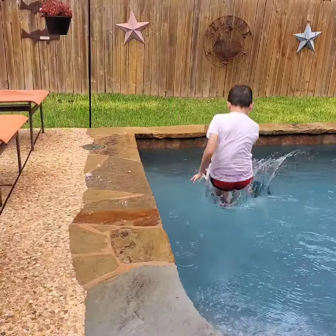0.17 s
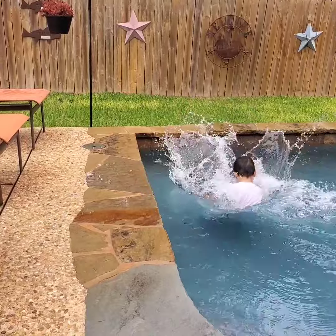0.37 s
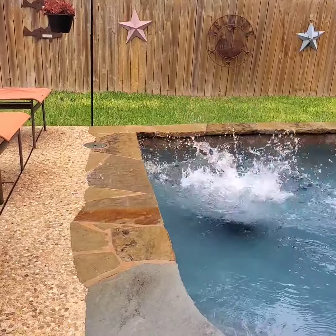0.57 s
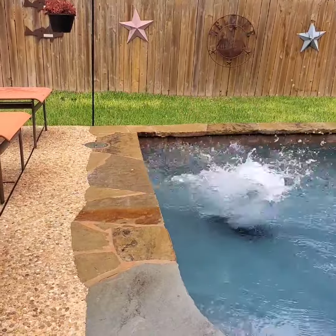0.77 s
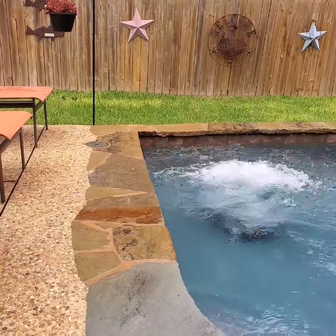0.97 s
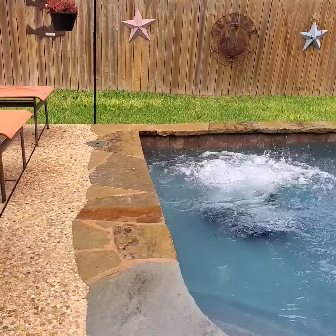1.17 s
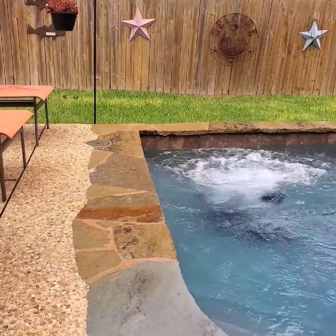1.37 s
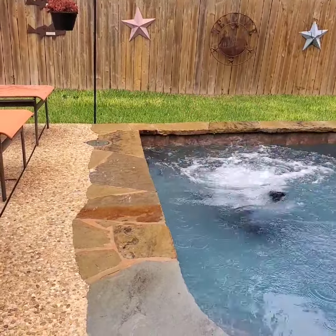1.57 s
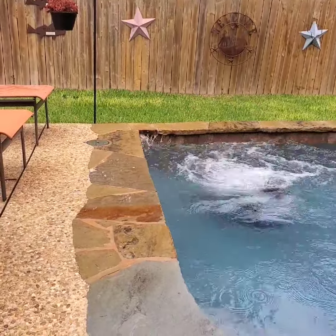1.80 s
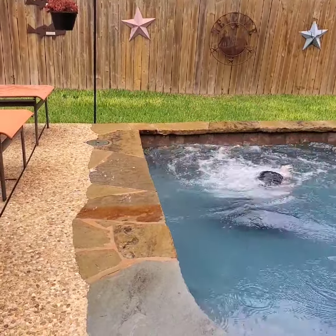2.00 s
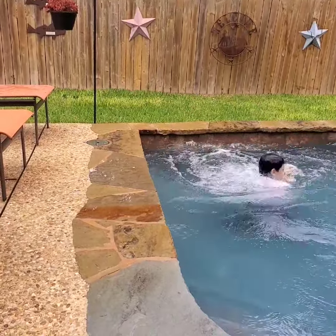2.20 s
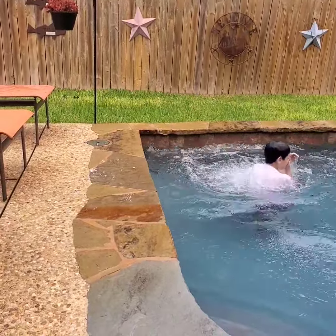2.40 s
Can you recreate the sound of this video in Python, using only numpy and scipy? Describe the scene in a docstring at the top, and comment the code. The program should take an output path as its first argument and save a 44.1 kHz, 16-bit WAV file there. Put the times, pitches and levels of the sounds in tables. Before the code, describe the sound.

Pool splash heard from a few metres off, leaning slightly left: light first contact, loud smack, booming gulp, second heavy splash, then hissing bubbles, ticking drops on water and stone, and quiet gurgling at the end.

```python
"""Backyard pool, a few metres away: a child jumps in feet first.
Slaps are decaying noise bursts; the closing air cavity plunks as swelling, gliding sines over deeper heaves.
Spray, falling sheets and churn are swarms of rising bubble rings over noise; clots pelt as noise cracks.
Drops tick as noise on water and the stone rim, with small ringing bubbles; late air pockets gurgle
as the swimmer comes up. Low rumble and garden hush lie beneath; deck and fence reflect the splash."""
import sys
import numpy as np
from scipy import signal
from scipy.fft import rfft, irfft
from scipy.io import wavfile

SR = 44100
rng = np.random.default_rng(int(sys.argv[2]) if len(sys.argv) > 2 else 0)


def store_pcm(level_fs):
    """Save levels as 16-bit WAV."""
    pcm = np.round(np.clip(level_fs, -1, 1) * 32767).astype(np.int16)
    wavfile.write(sys.argv[1], SR, np.atleast_2d(pcm).T)


N = 108045
TIME, HZ = np.arange(N) / SR, np.fft.rfftfreq(N, 1 / SR)

# Every *_COLOUR_DB table is a spectrum. Each row: frequency in Hz, relative level in dB.
# Every *_LEVEL_DB table is a level curve. Each row: time in seconds, level in dB.

# Low rumble of moving water and air; faint garden hush.
RUMBLE_LEVEL_DB = [(0, -42.5), (.25, -46), (.3, -31.5), (.36, -38), (.44, -30.5), (.5, -32), (.6, -66),
                   (.68, -36), (.76, -48.5), (.95, -42), (1.2, -55), (1.49, -43), (1.6, -46.5), (2.0, -46),
                   (2.29, -41), (2.45, -49.5)]
RUMBLE_COLOUR_DB = [(34, -36), (48, 2), (70, -0.5), (115, 2.5), (150, -15), (240, -15), (400, -33)]
AIR_DB = -51.5
AIR_COLOUR_DB = [(120, 3), (165, -19), (245, -2.5), (290, -23), (800, -16.5), (1300, -31), (8000, -37.5),
                 (16000, -68)]

# Fine spray and foam.
SPRAY_LEVEL_DB = [(.101, -72), (.109, -36.5), (.145, -34.5), (.24, -30.5), (.3, -34), (.49, -35),
                  (.6, -36.5), (.8, -44), (.97, -42), (1.25, -45.5), (1.48, -47.5), (1.56, -51.5),
                  (1.72, -49.5), (2.03, -55.5), (2.25, -55.5), (2.45, -50)]
SPRAY_COLOUR_DB = [(500, -45), (1100, -3), (1600, -1), (2600, 0.5), (4500, 3), (6500, -1), (7700, -8),
                   (9500, -4.5), (13000, -2), (16000, -1)]
# Sheets of water falling back and sloshing.
SLOSH_LEVEL_DB = [(.102, -62.5), (.112, -55), (.19, -39.5), (.245, -32), (.265, -25), (.32, -28.5),
                  (.35, -30.5), (.41, -30.5), (.485, -26), (.53, -30), (.59, -34), (.76, -39.5),
                  (1.02, -40.5), (1.3, -48), (1.73, -50), (1.98, -58), (2.15, -57.5), (2.24, -45),
                  (2.32, -50.5), (2.45, -45)]
SLOSH_COLOUR_DB = [(250, 2), (480, -13.5), (630, -4), (820, 0), (1000, -4), (1200, -15), (1520, -5.5),
                   (2000, -14), (6000, -21.5)]
# Bubble cloud under the surface.
CHURN_LEVEL_DB = [(.1, -71), (.125, -46.5), (.23, -40), (.29, -23), (.37, -30), (.49, -29.5), (.59, -40),
                  (.68, -42), (.8, -39.5), (.94, -43.5), (1.05, -47.5), (1.27, -44.5), (1.36, -51),
                  (1.7, -58.5), (2.04, -59.5), (2.13, -45), (2.28, -54.5), (2.45, -66)]
CHURN_COLOUR_DB = [(60, -35), (130, -6.5), (250, 1), (370, -0.5), (480, -6.5), (700, -10.5)]
SPREAD_S = .00009  # rms scatter of arrival times between the ears

# Coarse clots pelting down with the falling sheets; PELT_DB is relative to the slosh curve.
PELT_PER_S, PELT_DECAY_S, PELT_DB = 380, 0.0014, -7.5
PELT_COLOUR_DB = [(600, -5), (1500, 7), (4500, -1.5), (7000, -15.5)]

# Slaps of limbs and body on the surface. Each row: start in seconds, onset level in dB, decay in seconds.
SLAPS = [(.111, -29.5, .002), (0.1238, -21.5, 0.0021), (0.1494, -26.5, 0.006), (0.2496, -5.5, 0.0011),
         (0.2508, -10.5, 0.0021), (0.256, -26.5, 0.015), (0.277, -20, 0.0098), (.309, -27, 0.0033),
         (0.483, -22, 0.0061)]
SLAP_COLOUR_DB = [(100, -23), (400, -8), (850, 9), (1150, -1), (2000, 4.5), (5900, -1.5), (7500, -18),
                  (11000, -24), (16000, -12)]

# Large air pockets ringing as they close, behind the body and later round the surfacing head.
# Each row: start in seconds, starting pitch in Hz, level in dB, swell time in seconds,
# glide in octaves per second.
POCKETS = [(.251, 809, -19, 0.009, -7.5), (0.2714, 403, -8.5, 0.0055, -5), (.276, 256, -15.5, 0.0056, 7.5),
           (.297, 377, -22, 0.0075, 7), (.319, 329.5, -22, 0.01, 2), (.3205, 772, -15, 0.0018, -3),
           (0.331, 169.7, -20.5, 0.015, 1.5), (.404, 203, -19.5, 0.0029, 9), (.421, 834, -22.5, 0.0036, 14),
           (0.429, 222, -15, 0.0046, -1), (.441, 776, -23.5, 0.0077, -4), (.464, 860, -22.5, 0.0038, -10),
           (.477, 238, -22, .004, -9), (.709, 1480, -31, 0.0029, 4), (.785, 221, -28.5, 0.011, 2),
           (.831, 251, -24.5, 0.0054, -1), (.872, 807, -32.5, 0.0056, 8.5), (.916, 223, -31, .012, 6.5),
           (1.2465, 900, -32.5, 0.0016, -1), (1.512, 1480, -40.5, 0.0043, -8),
           (1.7196, 830, -36.5, 0.0021, 4), (1.725, 517, -44.5, 0.006, -1),
           (2.061, 238.4, -35.5, 0.016, -13), (2.072, 386, -46.5, 0.015, 5),
           (2.112, 146, -31.5, 0.026, 5.5), (2.122, 261.4, -40.5, 0.032, 8),
           (2.177, 394, -35.5, 0.012, 3.5), (2.213, 503, -43.5, 0.015, 5.5), (2.404, 909, -42, 0.007, -2.5)]
# Heaves of displaced water. Each row: start in seconds, pitch in Hz, level in dB, swell time in seconds.
HEAVES = [(0.274, 72, -26.5, 0.0064), (.305, 51, -26.5, 0.019), (0.383, 71.5, -26.5, 0.011),
          (0.473, 53.4, -26.5, 0.017)]
SWELL_POWER, GURGLE_DB = 1.72, -15

# Drops falling back on the water. Each row: start in seconds, onset level in dB.
DROPS = [(.9787, -30), (1.2435, -39), (1.262, -32.5), (1.361, -37), (1.3735, -36.5), (1.401, -36),
         (1.423, -34.5), (1.4755, -34.5), (1.7205, -39), (1.837, -41)]
DROP_DECAY_S = 0.0029
DROP_COLOUR_DB = [(1500, -29), (3800, 4), (6500, -1), (10000, -8), (15000, -5.5)]
# Drops spattering on the stone rim. Each row: start in seconds, onset level in dB.
SPATTERS = [(1.601, -32.5), (1.6095, -38), (1.6395, -31.5), (1.6853, -37), (1.709, -38.5), (1.713, -36)]
SPATTER_DECAY_S = 0.0038
SPATTER_COLOUR_DB = [(1500, -4), (3500, 3.5), (6200, 0), (8000, -7), (14000, 3)]
# Small bubbles left ringing by drops. Each row: start in seconds, pitch in Hz, level in dB.
PLIPS = [(1.59, 2920, -30), (1.6003, 3200, -27.5), (1.6016, 1456, -25), (1.6088, 5430, -29.5),
         (1.6192, 1250, -34), (1.639, 4760, -31.5), (1.7095, 6400, -27), (2.14, 2200, -39)]
PLIP_DECAY_CYCLES = 4.3

YARD_DB, YARD_T60_S, YARD_LOW_HZ, YARD_TAPS_PER_S = -11.5, 0.12, 900, 1500
# Lean to the left. Each row: frequency in Hz, excess of left over right in dB.
LEFT_LEAD_DB = [(150, 0.75), (700, 3.5), (5000, 3.5), (8000, 2)]
BASS_CUT_HZ, EDGE_HZ = 35, 15800


def amp(db):
    """Decibels to gain."""
    return 10 ** (np.asarray(db) / 20)


def evened(x):
    """Scales to unit rms."""
    return x / np.sqrt(np.mean(x ** 2) + 1e-20)


def level(curve):
    """Gain at every sample from a level curve."""
    return amp(np.interp(TIME, *np.transpose(curve)))


def read(points):
    """Value at every frequency, interpolated over log frequency."""
    hz, value = np.transpose(points)
    return np.interp(np.log(HZ + 1), np.log(hz), value)


def coloured(x, colour):
    """Filters by a spectrum that falls away above its last point."""
    rolloff = 1 + (HZ / (2 * colour[-1][0])) ** 4
    return irfft(rfft(x) * amp(read(colour)) / rolloff, N)


def highpass(x, hz):
    """Second-order bass cut."""
    return signal.sosfilt(signal.butter(2, hz, "high", fs=SR, output="sos"), x)


def add(mix, start_s, sound):
    """Mixes a sound in at a time, cut at the end of the mix."""
    part = mix[:, round(start_s * SR):][:, :sound.shape[-1]]
    part += sound[..., :part.shape[1]]


def background():
    """Low rumble and garden hush: coloured noise, the rumble following its level curve."""
    rumble = level(RUMBLE_LEVEL_DB) * evened(coloured(rng.standard_normal(N), RUMBLE_COLOUR_DB))
    hush = rng.standard_normal(N) + .5 * rng.standard_normal((2, N))
    return rumble + amp(AIR_DB) * evened(coloured(hush, AIR_COLOUR_DB))


def bubbles(curve, colour, low_hz, high_hz, per_s, thinning, decay_cycles, rise, spread_db, blur_db, count=36):
    """Short rising rings over a blur of noise for countless fainter ones; rings thin out as level falls."""
    gain = level(curve)
    busy = (gain / gain.max()) ** thinning
    size = amp(spread_db * np.minimum(rng.exponential(1, N), 4)) * rng.choice([-1, 1], N)
    born = rng.random(N) < per_s * busy / SR
    births = size * born / np.sqrt(busy)  # fewer but larger when quiet
    kind = rng.integers(0, count, N)
    lags_s = SPREAD_S * evened(rng.standard_normal(count))
    swarm = 0
    for k, hz in enumerate(np.geomspace(low_hz, high_hz, count)):
        u = TIME[:SR // 6] * hz / decay_cycles  # time in decay lengths
        turns = decay_cycles * (u + rise * (u - 1 + np.exp(-u)))  # pitch climbs towards hz * (1 + rise)
        ring = np.exp(-u) * np.sin(2 * np.pi * turns)
        spectrum = rfft(births * (kind == k)) * rfft(evened(ring), N) * np.sqrt(hz)
        lagged = spectrum * np.exp(2j * np.pi * HZ * lags_s[k])
        swarm = swarm + np.array([spectrum, lagged])
    # Noise whose ears agree less towards the treble, as the scattered lags imply.
    a, b = rfft(rng.standard_normal((2, N)))
    same = np.exp(-.5 * (2 * np.pi * HZ * SPREAD_S) ** 2)
    blur = irfft(np.array([a, same * a + np.sqrt(1 - same ** 2) * b]), N)
    rings = evened(coloured(irfft(swarm, N), colour))
    return gain * evened(rings + amp(blur_db) * evened(coloured(blur, colour)))


def water():
    """Fine spray, falling sheets and the deep bubble cloud: three bubble swarms from high to low pitch."""
    spray = bubbles(SPRAY_LEVEL_DB, SPRAY_COLOUR_DB, 1012, 16460, per_s=11000, thinning=.6,
                    decay_cycles=6.8, rise=0.14, spread_db=5.0, blur_db=3)
    slosh = bubbles(SLOSH_LEVEL_DB, SLOSH_COLOUR_DB, 460.3, 4100, per_s=3000, thinning=0.078,
                    decay_cycles=4.86, rise=0.081, spread_db=3, blur_db=-6.5)
    churn = bubbles(CHURN_LEVEL_DB, CHURN_COLOUR_DB, 115, 456, per_s=800, thinning=.3,
                    decay_cycles=2.35, rise=0.11, spread_db=3.0, blur_db=-6.5)
    return spray + slosh + churn


def pelting():
    """Separate clots of water hit the surface, each a very short noise crack."""
    hits = rng.exponential(1, N) * (rng.random(N) < PELT_PER_S / SR)
    power = signal.lfilter([1], [1, -np.exp(-2 / (PELT_DECAY_S * SR))], hits)
    burst = np.sqrt(power)
    crack = rng.standard_normal(N) + rng.standard_normal((2, N))
    return amp(PELT_DB) * level(SLOSH_LEVEL_DB) * evened(coloured(burst * crack, PELT_COLOUR_DB))


def slaps():
    """Flesh strikes water: sharp onsets with exponential decay on softly clipped noise."""
    burst = sum(amp(db) * (TIME >= s) * np.exp(-abs(TIME - s) / decay_s) for s, db, decay_s in SLAPS)
    crack = rng.standard_normal(N) + 0.88 * rng.standard_normal((2, N))
    tilt = amp([[1], [-1]])  # dB left, right
    return tilt * burst * np.tanh(evened(coloured(crack, SLAP_COLOUR_DB)))


def pulsation(hz, db, swell_s, glide_oct_per_s):
    """A mass of air and water swells into a ring and dies away, a little unsteadily."""
    u = np.arange(0, 7, 1 / (swell_s * SR))  # time in swell lengths
    turns = np.cumsum(hz * 2 ** (glide_oct_per_s * u * swell_s)) / SR
    lowpass = signal.butter(2, hz / 2, fs=SR, output="sos")
    unrest = evened(signal.sosfilt(lowpass, rng.standard_normal(SR)))[:len(u)]
    envelope = (u * np.exp(1 - u)) ** SWELL_POWER  # peaks at u = 1
    ring = np.sin(2 * np.pi * turns)
    gurgle = amp(GURGLE_DB) * unrest * np.cos(2 * np.pi * turns)
    return amp(db) * envelope * (ring + gurgle)


def plunks():
    """Air pockets ring with gliding pitch, and the water heaves under them at steady pitch."""
    out = np.zeros((2, N))
    for s, hz, db, swell_s, glide_oct_per_s in POCKETS:
        add(out, s, pulsation(hz, db, swell_s, glide_oct_per_s))
    for s, hz, db, swell_s in HEAVES:
        add(out, s, pulsation(hz, db, swell_s, 0))
    return out


def ticks(rows, decay_s, colour):
    """Each drop bursts in a short wet tick of decaying noise."""
    burst = sum(amp(db) * (TIME >= s) * np.exp(-abs(TIME - s) / decay_s) for s, db in rows)
    return burst * evened(coloured(rng.standard_normal((2, N)), colour))


def plips():
    """Small bubbles ring as sines that decay over a fixed number of cycles."""
    out, t = np.zeros((2, N)), TIME[:SR // 20]
    for s, hz, db in PLIPS:
        envelope = (1 - np.exp(-t * hz)) * np.exp(-t * hz / PLIP_DECAY_CYCLES)
        add(out, s, amp(db) * envelope * np.sin(2 * np.pi * hz * t))
    return out


def drops():
    """Drops tick on water and on stone, and small bubbles ring."""
    on_water = ticks(DROPS, DROP_DECAY_S, DROP_COLOUR_DB)
    on_stone = ticks(SPATTERS, SPATTER_DECAY_S, SPATTER_COLOUR_DB)
    return plips() + on_water + on_stone


def yard(x):
    """Deck and fence: sparse random reflections, independent per ear, decaying 60 dB per T60."""
    t = TIME[:SR // 2]
    present = rng.random((2, len(t))) < YARD_TAPS_PER_S / SR
    taps = rng.standard_normal((2, len(t))) * present * (t > .003) * amp(-60 * t / YARD_T60_S)
    taps /= np.linalg.norm(taps, axis=1, keepdims=True)
    return signal.fftconvolve(highpass(x, YARD_LOW_HZ), taps, axes=1)[:, :N]


def scene():
    """The splash in its yard, leaning to the left."""
    splash = water() + pelting() + slaps() + plunks() + drops()
    mix = background() + splash + amp(YARD_DB) * yard(splash)
    lean = amp(np.outer([.5, -.5], read(LEFT_LEAD_DB)))  # half the lead to each side
    return irfft(rfft(mix) * lean, N)


def record(dry):
    """Zero-phase bass cut and linear-phase treble limit."""
    bass_cut = signal.butter(4, BASS_CUT_HZ, "high", fs=SR, output="sos")
    dry = signal.sosfiltfilt(bass_cut, dry)
    treble_limit = signal.firwin(511, EDGE_HZ, window=("kaiser", 9), fs=SR)
    return signal.oaconvolve(dry, treble_limit[None], "same")


dry = scene()
out = record(dry)
store_pcm(out)
```